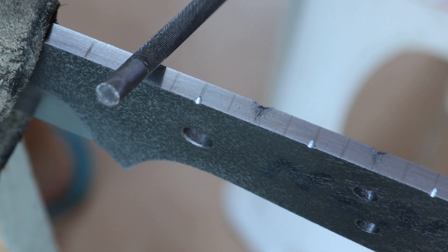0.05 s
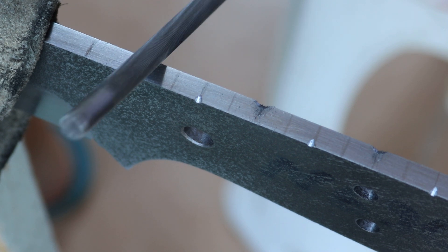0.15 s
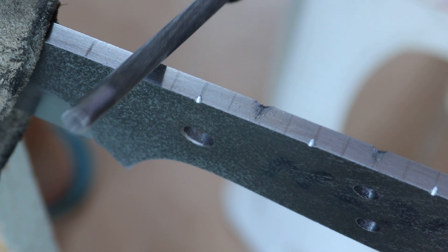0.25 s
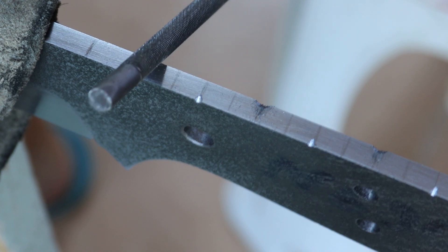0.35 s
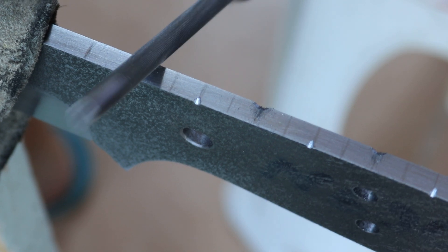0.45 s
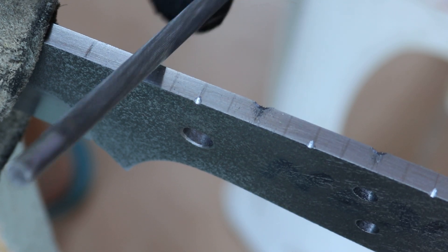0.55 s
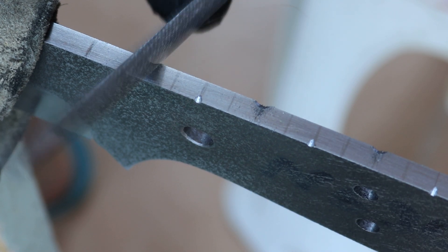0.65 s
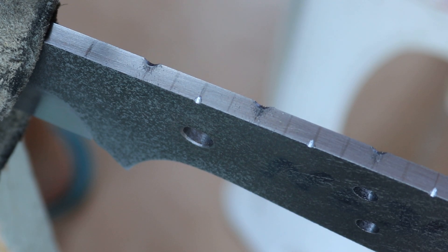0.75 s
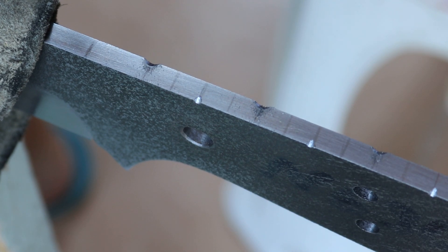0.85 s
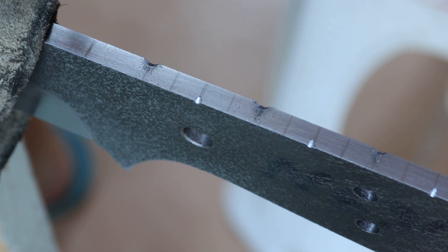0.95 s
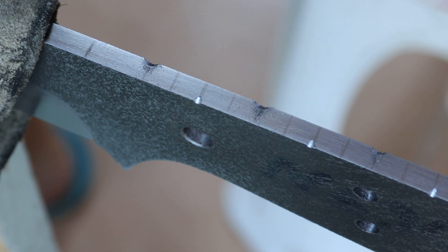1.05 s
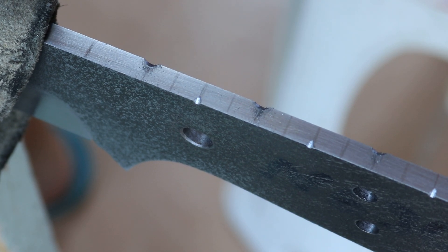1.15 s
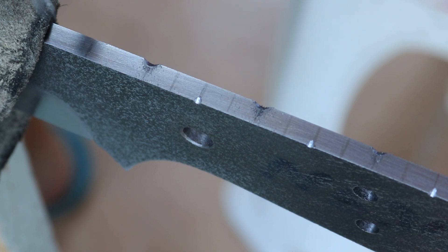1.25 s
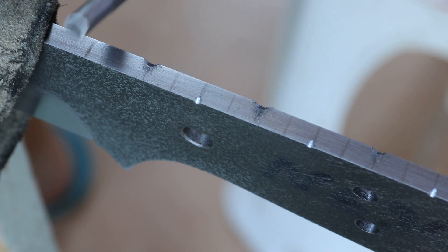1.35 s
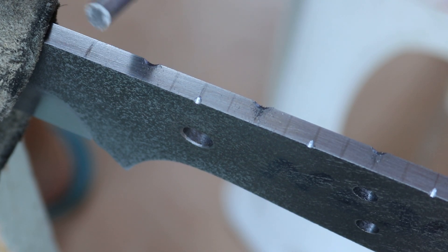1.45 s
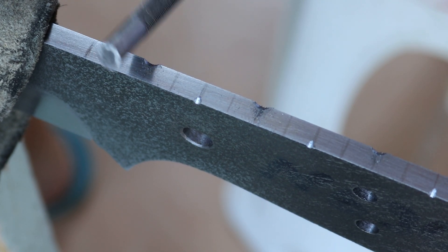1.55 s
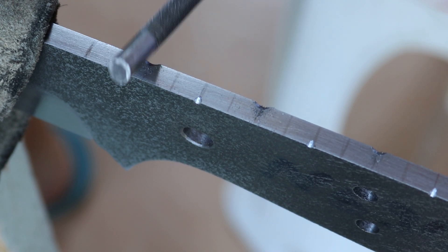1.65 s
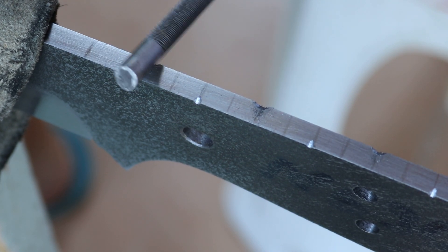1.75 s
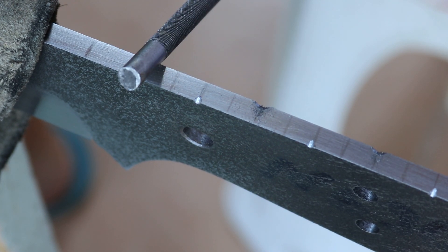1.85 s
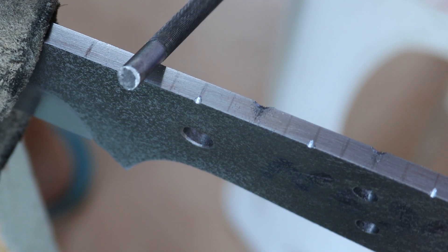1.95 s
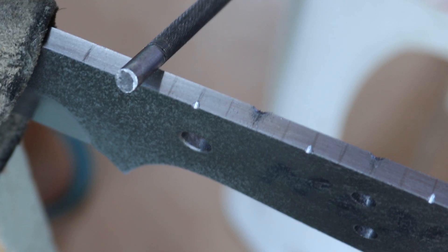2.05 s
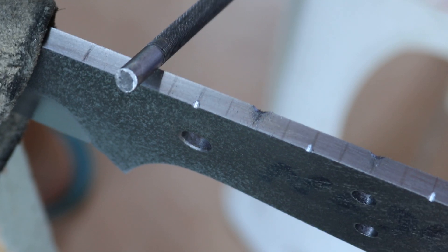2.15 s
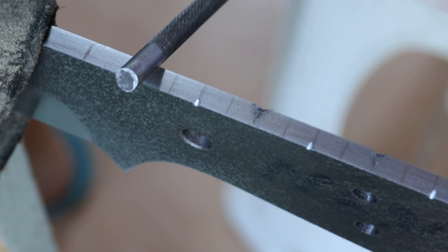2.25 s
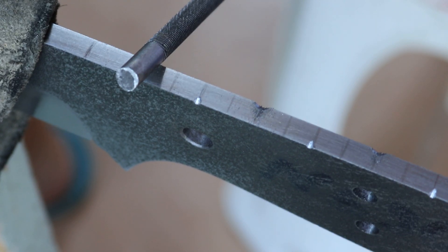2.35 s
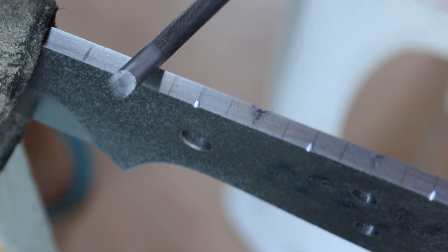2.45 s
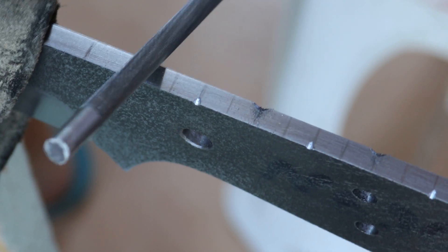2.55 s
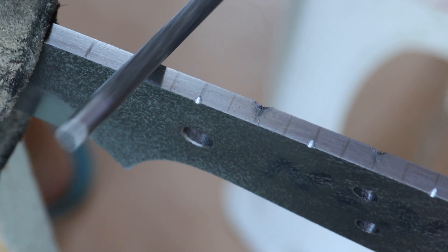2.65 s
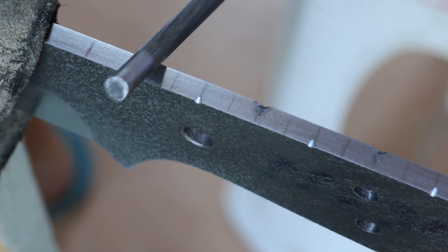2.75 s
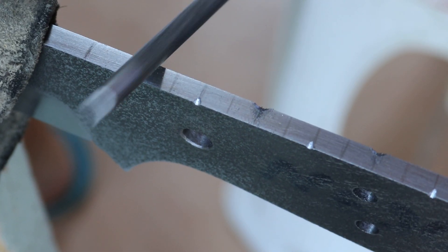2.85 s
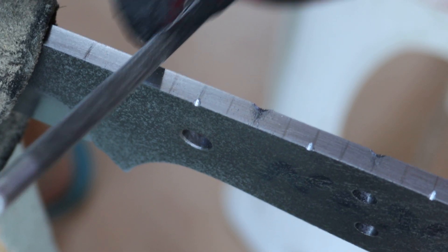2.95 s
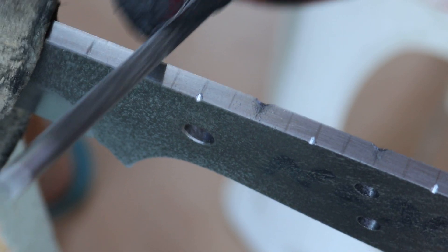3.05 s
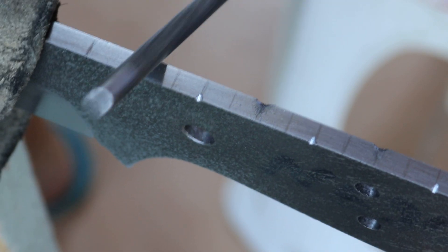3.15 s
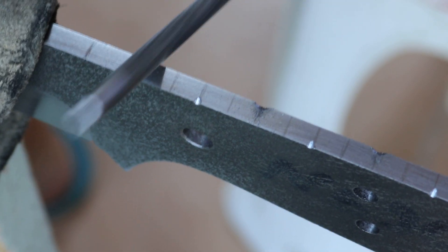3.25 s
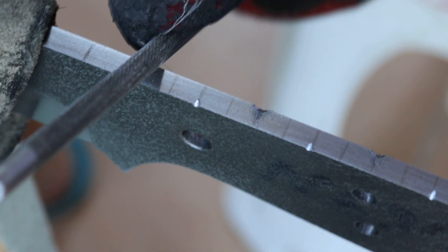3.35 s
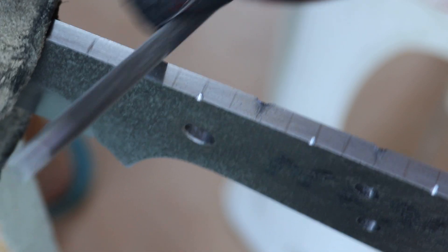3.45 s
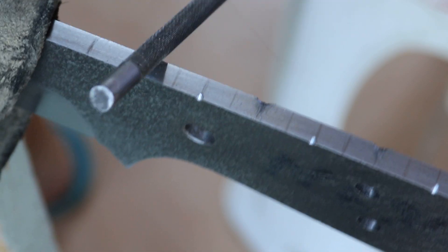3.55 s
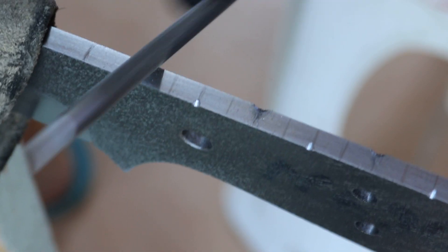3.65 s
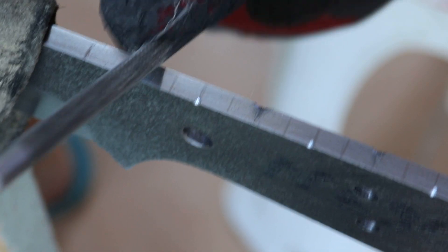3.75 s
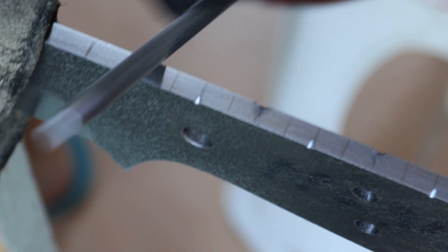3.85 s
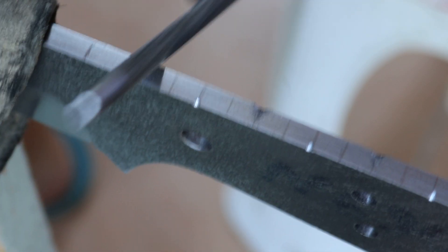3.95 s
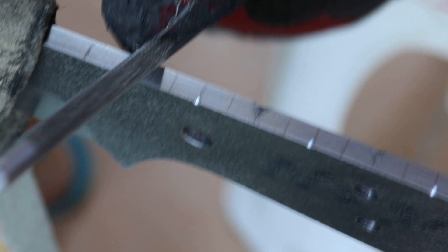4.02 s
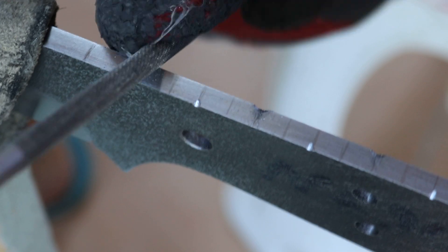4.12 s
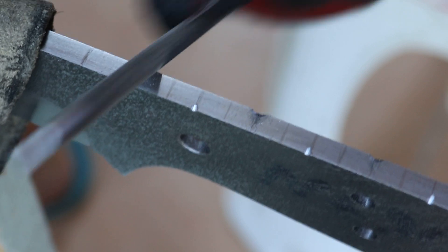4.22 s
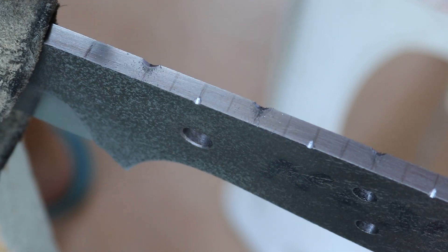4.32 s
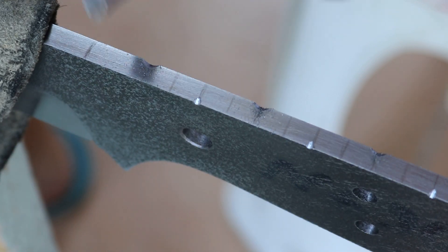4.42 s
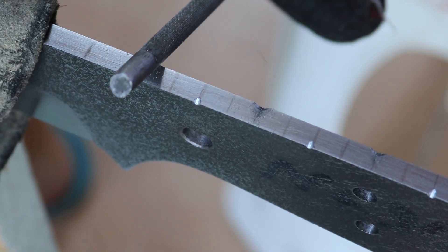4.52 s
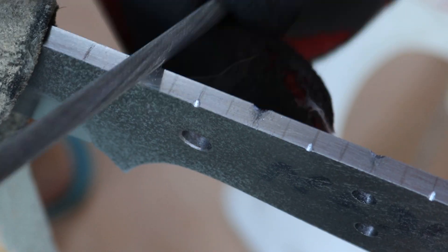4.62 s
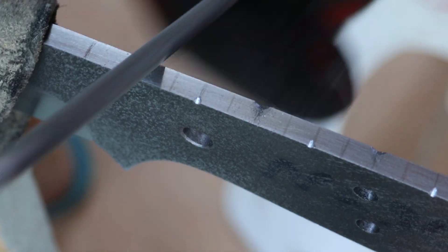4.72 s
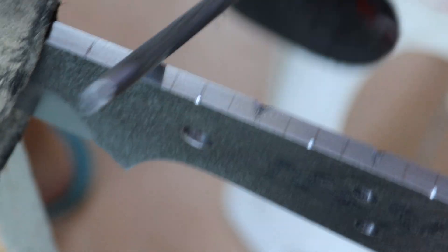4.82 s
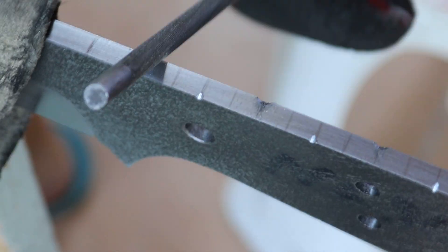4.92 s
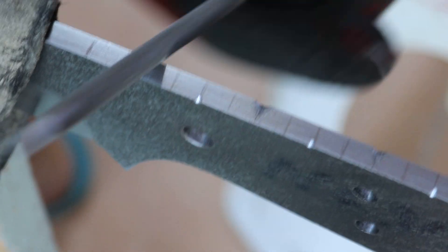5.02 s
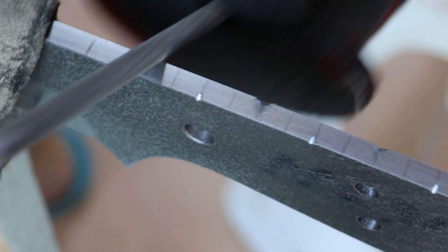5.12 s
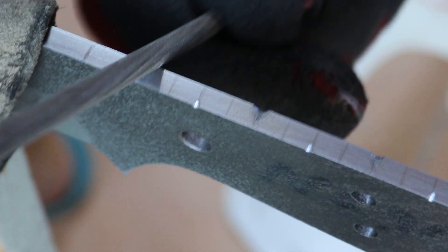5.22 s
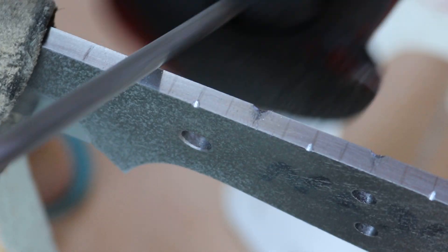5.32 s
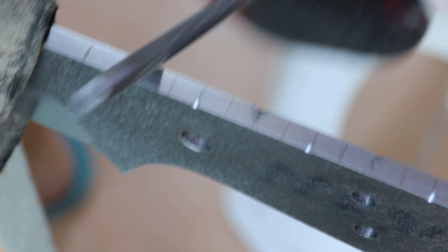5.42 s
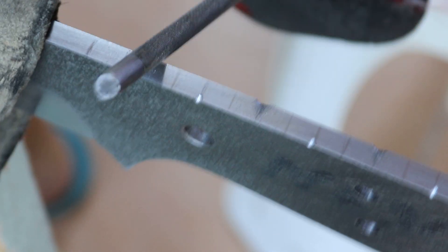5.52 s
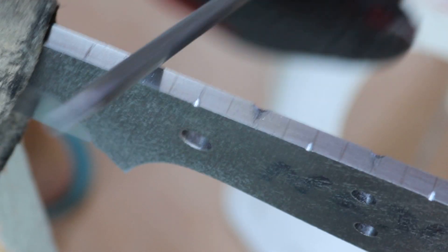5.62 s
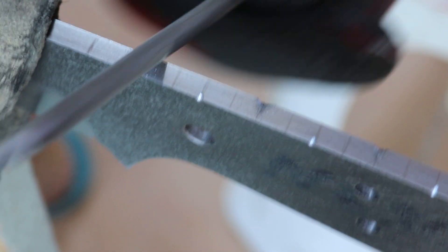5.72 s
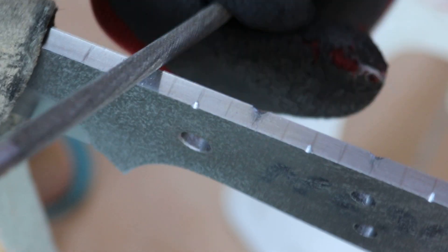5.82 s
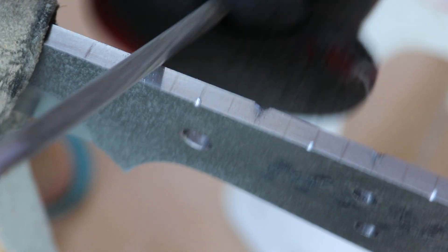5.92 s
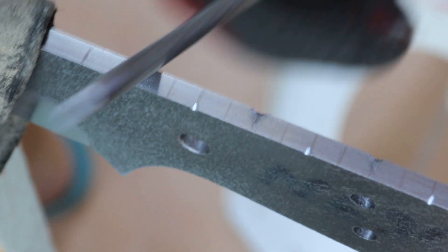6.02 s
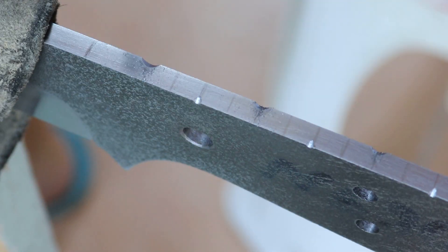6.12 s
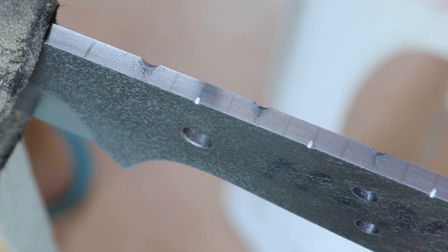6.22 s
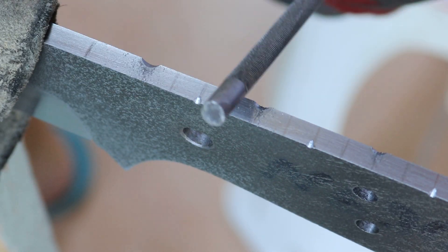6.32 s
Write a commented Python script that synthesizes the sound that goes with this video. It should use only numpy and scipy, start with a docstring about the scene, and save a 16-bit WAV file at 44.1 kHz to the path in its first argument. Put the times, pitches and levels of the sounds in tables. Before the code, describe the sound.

Close stereo in a small workshop: a round file grinds a vise-held steel blade, at first slowed three times, so the rasps are low, coarse and ringing. A pause holds faint scuffs, camera bumps and a duller clack. Low filing resumes, then abruptly changes to bright full-speed scrubbing, breaks briefly around a tick, and continues until it stops, leaving hiss and a far bird chirp.

```python
"""Workshop, stereo ports: first, in slow motion (three times slower and lower), a round file cuts a knife spine.
The blade is held in a vise; strokes, then stray touches and scuffs, then filing again drive its ringing steel.
From 4.01 s the filing runs at full speed, some eight strokes to and fro a second, with a short break, to 6.14 s.
Throughout: drag, tooth chatter and gritty noise, steady background hiss, rumble and bumps on the jostled camera.
A bird, whistling far off, opens and ends the scene. Tables hold playing times, but workshop Hz and decays."""
import sys
import numpy as np
from scipy import signal
from scipy.fft import rfft, irfft, next_fast_len
from scipy.io import wavfile
from scipy.ndimage import uniform_filter1d

SR = 44100
rng = np.random.default_rng(int(sys.argv[2]) if len(sys.argv) > 2 else 0)


def log_audio(samples):
    """Write samples as a 16-bit WAV file to the path given in sys.argv[1]."""
    # one column per channel
    frames = np.atleast_2d(samples).T
    # limit to full scale, then quantise
    limited = np.clip(frames, -1, 1)
    pcm = np.round(limited * 32767).astype(np.int16)
    wavfile.write(sys.argv[1], SR, pcm)


N = 281358

# turns of the file, push and pull by turns: (time [s], pressure [dB], factor on the tooth rate)
TURNS = [(.163, 1.5, 1.22), (.322, -3.5, 0.98), (.498, 1.4, 1.06), (2.55, 1, 1.8), (2.724, -2.75, .9),
         (2.9, 0.5, 1.08), (3.125, -1.5, 0.61), (3.315, 0, .9), (3.514, -1, 0.66), (3.685, 0.9, 0.67),
         (3.861, -1, 0.51), (4.018, 0, 0.53), (4.08, -1, 0.67), (4.14, .5, 0.66), (4.198, -1, 0.71),
         (4.252, 0, .7), (4.622, 0, 0.93), (4.692, -0.5, 0.56), (4.755, 0, 0.82), (4.817, -0.5, 1.01),
         (4.876, 0, 0.66), (4.934, 0, 0.9), (4.993, 0, 0.87), (5.056, -0.5, 1.3), (5.117, 0, 0.69),
         (5.177, -0.5, 1.05), (5.237, -.5, .75), (5.297, 0, 1.15), (5.353, -0.5, 0.66), (5.415, -0.5, 1.18),
         (5.472, -0.5, 0.91), (5.535, -0.5, 1.06), (5.592, -0.5, 0.72), (5.652, 0.5, 1.17), (5.71, 0, 1.26),
         (5.77, 0, 1.18), (5.828, -1.5, 0.63), (5.888, 0, 1.06), (5.947, 0, .8), (6.005, 0.5, 1.25),
         (6.066, -1.5, 0.81)]
# spells of filing, each opening with a push, which may reach top speed sooner:
# (end of the spell [s]: the file lifts off, or full speed begins,
#  factor on rise and catch times of that first push, the same for later strokes,
#  grit level [dB], change of grit from start to end of a push [dB])
FILING_SPELLS = [(.725, .85, .95, -3.5, -5), (4.019, .45, 0.92, 1, -8.5), (4.324, 1, 1.1, 2, -8),
                 (6.14, .9, .95, 1, -1.5)]
# each direction: (share of the stroke before top speed, tooth rate there before the stroke's factor [Hz],
#  glide over the stroke [octaves], drag level [dB], chatter level [dB], grit level [dB])
PUSH_STROKE = (0.3981, 4298, -1.87, -5.5, -17.5, -3)
PULL_STROKE = (0.42, 6400.5, 0.62, -6.5, -14.5, -4.5)
# the file touches the blade: (time [s], level [dB], brightness [Hz])
BLADE_TOUCHES = [(0.038, -18, 5500), (0.17, -5.5, 9050), (0.193, 0, 14100), (.502, 1, 14200),
                 (1.185, -16, 16000), (1.221, -21, 9000), (1.47, -20, 9050), (1.778, -17.5, 7000),
                 (1.866, -19, 7000), (1.898, -19, 12100), (2.084, -4.5, 2330), (2.177, -24, 9000),
                 (2.553, 2, 25500), (2.911, -8, 21770), (4.55, -11.5, 20000)]
# resonances of blade, file and vise, standing on the broad colour below:
# (frequency [Hz], width [Hz], left height [dB], right height [dB])
STEEL_MODES = [(917, 54.4, 13, 13), (1113, 109, 9.5, 8), (1847, 180, 11, 6), (2926, 65, 4.5, 8.5),
               (4004, 180, 7.5, -3.7), (4950, 990, 5.5, 3.5), (6090, 173, 8.5, 7.5), (7930, 97, 8.5, 3.5),
               (8670, 580, -3, 13.5), (8890, 540, 18, -6.5), (9084, 104, -23, 11.5),
               (10730, 250, 6.5, 13.5), (11190, 180, 13.5, 12.5), (17000, 350, 10.5, 8),
               (19200, 1700, -0.5, -1.2), (19200, 770, 7.5, -2), (22000, 900, 9, 17.5), (23100, 510, 9, 12),
               (24300, 160, 22, 5), (27600, 1500, 7.5, 11), (28300, 190, 27, 18), (31000, 580, 13, -18),
               (32300, 1200, 5, 6), (34000, 470, -27, 19.5), (39100, 2400, 15, -0.5), (39700, 2527, 5, 8),
               (44100, 1300, -15, 23), (44750, 980, -14, 17)]
# broad colour of the steel, direct and reflected sound together: (frequency [Hz], level [dB])
STEEL_COLOUR = [(130.0, -17), (300.0, -29), (680.0, -19.5), (850.0, -3), (1300.0, -5), (1900.0, -16),
                (2600.0, -6.5), (5000.0, -8), (8000.0, -8), (12000.0, -16.5), (16000.0, -16),
                (25000.0, -34.5), (36000.0, -38.5), (46000.0, -62.5)]
# phase lead of the left microphone port: (frequency [Hz], lead [rad])
LEFT_LEAD = [(700, -0.5), (3200, 0.6), (4000, 2), (5600, 1.47), (7000, 1.6), (8300, 3), (9800, -0.5),
             (11000, 3.5), (12500, 7.5), (15000, 8), (20000, 8.5)]
# workshop reflections against the direct sound: (frequency [Hz], level [dB])
REFLECTIONS = [(900, -28.5), (1150, -20), (1500, -0.5), (2700, -9), (4000, -6), (9000, -10.5),
               (20000, -27.5)]
# bumps on the camera: (time [s], level [dB], frequency [Hz], left minus right [dB])
CAMERA_BUMPS = [(0.52, -27, 388, -14), (.721, -25, 390, -24.5), (1.238, -32, 346, -22),
                (1.323, -22.5, 490, -29), (1.346, -25, 334, -13), (1.387, -26.5, 278, -7),
                (1.812, -29.5, 332, 23), (1.867, -22, 254, 20), (1.957, -21, 337, 21),
                (2.086, -28.5, 258, -20), (4.2, -21, 358, -21), (4.214, -17, 506, -27),
                (5.774, -20, 224, -19), (5.839, -12, 410, -30), (5.954, -15.5, 527, -6),
                (6.006, -19.5, 440, -7)]
# hands shake bench and camera, before the common rumble gain: (start time [s], length [s], level [dB])
RUMBLE_SWELLS = [(0.004, 1, -44.5), (0.698, 0.2, -36), (1.283, 0.15, -35), (1.8, 0.57, -47.5),
                 (2.799, 0.94, -31.5), (3.802, 0.37, -34.5), (4.052, 0.069, -23.5), (4.137, 0.034, -25),
                 (4.186, 0.044, -21.5), (4.922, 0.091, -42), (5.115, 0.061, -40.5), (5.57, 0.35, -34),
                 (5.694, 0.024, -26.5), (5.746, 0.15, -24.5), (6.294, 0.075, -33.5)]
# colour of the rumble before its level is evened out: (frequency [Hz], level [dB])
RUMBLE_SPECTRUM = [(50, 1), (110, -2), (230, 3.5), (450, 0), (700, -5.5), (1200, -12), (3000, -42)]
# bird chirps, before the direct and echo gains and the random flicker:
# (start time [s], end time [s], first pitch [Hz], last pitch [Hz], level [dB])
BIRD_CHIRPS = [(0, 0.083, 2090, 1950, -38.5), (1.037, 1.191, 1306, 1808, -42),
               (4.524, 4.589, 1300, 1900, -42), (5.765, 5.793, 1736, 1934, -33),
               (5.82, 5.845, 1850, 1970, -33), (6.226, 6.278, 1945, 2020, -42),
               (6.304, 6.354, 1710, 1964, -42.5), (6.322, 6.353, 2430, 2400, -39.5)]
# steady background hiss: (frequency [Hz], level [dB])
HISS_SPECTRUM = [(60, -39), (130, -47), (260, -48.5), (1000, -34), (3000, -39.5), (8000, -44.5),
                 (15000, -48.5), (25000, -53), (46000, -62)]

SLOW, CUT_S = 3, 4.01  # slow-motion factor, and the playing time at which it ends
FINE = SLOW * SR  # the scene is built at this rate [Hz], so that slow motion still has treble
CUT = round(CUT_S * SR)
SIZE = CUT + SLOW * (N - CUT)
BASS_CUT_HZ, EDGE_HZ = 149, 16000  # bass cut at full speed; upper band limit of the whole

FOLLOW_S = .006  # a stroke runs on this long into the next
GRIT_EXTRA = 0.8  # dB per dB beyond the pressure itself: a light stroke skates, a heavy one cuts
SNAGS_PER_S, SNAGS_DB = 110, -11  # burrs that catch in the teeth, strongest early in a stroke
CATCH_S, SKID_DB = .011, -2.5  # after a turn the file skids about this long, softer, until the teeth catch
DRAG_POWER, DRAG_EASE_DB = 0.85, -3  # drag grows with speed to this power, and eases once the file runs freely
SHOVE_DB, SHOVE_S, SHOVE_HZ = -0.5, 0.0083, 1090  # short dull shove about the catch: level, decay, low-pass
CHATTER_POWER = 1.58  # chatter grows with speed to this power
FLUTTER_DB, FLUTTER_HZ = 2.8, 420  # rows of teeth catch and let go: greatest swing, changes a second
TOUCH_S, TOUCH_HZ, DULL_SLOPE = 0.002, 10000, 0.56  # decay at this brightness; duller touches last longer
# faint scuffs while the file is set to the next notch: from and to [s], rate, middle level
SEEK_FROM_S, SEEK_TO_S, SCUFFS_PER_S, SCUFFS_DB = 1, 1.2, 11, -20.5
BUMP_CYCLES = 0.53  # a bump swells for this part of a cycle
SWELL_ARCH = 0.52  # each rumble swell is half a sine wave to this power
RESTING_DB = -53  # rumble between the swells, before the common gain


def filing(side_db=-9.5, side_hz=2000):
    """All strokes and touches drive the same steel; the sliding contact sends each port different treble."""
    force = to_and_fro()
    side = gain_of(side_db) * passed(to_and_fro(), side_hz, "high", order=2)
    sliding = patchy(np.array([force + side, force - side]))
    return steel(sliding + landings())


def to_and_fro():
    """In each spell pushes and pulls alternate; each lasts until the next turn or the end of the spell."""
    force, begin = np.zeros(SIZE), 0
    for spell_end, first_lean, lean, spell_db, ease_db in FILING_SPELLS:
        rows = [row for row in TURNS if begin < row[0] + .02 < spell_end]
        ends = [row[0] for row in rows[1:]] + [spell_end]
        for k, ((start, pressure_db, pace), end) in enumerate(zip(rows, ends)):
            count = index(end) - index(start) + int(FOLLOW_S * FINE)
            direction = (0, *PULL_STROKE) if k % 2 else (ease_db, *PUSH_STROKE)
            add(force, start, stroke(count, pressure_db, pace, lean if k else first_lean, spell_db, *direction))
        begin = spell_end
    return force


def stroke(count, pressure_db, pace, lean, spell_db, ease_db,
           peak, tooth_hz, glide, drag_db, chatter_db, grit_db):
    """The file skids, catches, speeds up and stops: dull drag, tooth-rate chatter, bright grit and snags."""
    u, t = np.linspace(0, 1, count), np.arange(count) / FINE
    peak = np.clip(peak * lean, .1, .9)
    speed = np.maximum(np.sin(np.pi * u ** (np.log(.5) / np.log(peak))), 0)

    teeth = np.cumsum(tooth_hz * pace * speed * 2 ** (glide * (u - peak))) / FINE  # teeth passed so far
    knots = rng.standard_normal((2, 2000))
    # the bite changes at random every tooth or two, and as the hand shakes
    bite = np.interp(teeth / 1.5 + 900 * t, np.arange(knots.shape[1]), knots[0] + 1j * knots[1])
    chatter = 1.276 * (bite * np.exp(2j * np.pi * teeth)).real * speed ** CHATTER_POWER

    drag = passed(chips(count), 3080, "low", order=2)
    drag = drag * speed ** DRAG_POWER * gain_of(DRAG_EASE_DB * speed ** 2)

    grit = passed(chips(count), 4570, "high") * speed ** 2
    burrs = np.sqrt(FINE / SNAGS_PER_S) * (rng.random(count) < SNAGS_PER_S / FINE)
    snags = gain_of(SNAGS_DB) * burrs * np.sqrt(speed) * (1 - u)
    cutting_db = grit_db + spell_db + ease_db * u + GRIT_EXTRA * pressure_db
    cutting = gain_of(cutting_db) * (grit + snags)

    caught = t - CATCH_S * lean  # time since the teeth caught
    shove = passed(chips(count), SHOVE_HZ, "low", order=2) * np.exp(-abs(caught) / SHOVE_S)
    force = gain_of(drag_db) * drag + gain_of(chatter_db) * chatter + cutting
    force = force * gain_of(SKID_DB * (caught < 0)) + gain_of(SHOVE_DB) * shove
    pressure = gain_of(pressure_db) * (1 - np.exp(-t / 0.00074))  # the teeth take a moment to dig in
    flutter = gain_of(FLUTTER_DB * np.tanh(wander(count, hz=FLUTTER_HZ)))
    return force * pressure * flutter


def chips(count, per_s=30000, spread_db=2.5):
    """Tiny fractures of uneven size and random sign, at unit power."""
    size = gain_of(spread_db * np.minimum(rng.exponential(1, count), 4)) * rng.choice([-1, 1], count)
    x = size * (rng.random(count) < per_s / FINE)
    return x / np.sqrt(np.mean(x ** 2) + 1e-12)


def patchy(x, patchy_db=2.5):
    """The contact point slides, so the steel is driven in shifting patches of frequency."""
    z = signal.stft(x, nperseg=512)[2]
    patches = rng.standard_normal(z.shape[1:])
    patches = uniform_filter1d(patches, size=4, axis=0)  # across frequency
    patches = uniform_filter1d(patches, size=3, axis=1)  # across time
    gain = gain_of(patchy_db * np.minimum(patches / patches.std(), 1.5))
    return signal.istft(z * gain / np.sqrt(np.mean(gain ** 2)), nperseg=512)[1][:, :SIZE]


def landings(spread_db=11.5, scuff_hz=7000):
    """The clear touches, and faint scuffs at random while the file seeks the next notch."""
    force = np.zeros(SIZE)
    for s, db, bright_hz in BLADE_TOUCHES:
        add(force, s, touch(db, bright_hz))
    length = SEEK_TO_S - SEEK_FROM_S
    for place, size in rng.random((int(SCUFFS_PER_S * length), 2)):
        db = SCUFFS_DB + spread_db * (2 * size - 1)
        add(force, SEEK_FROM_S + place * length, touch(db, scuff_hz))
    return force


def touch(db, bright_hz):
    """Steel lands on steel with a very short crunch: decaying noise, longer when duller."""
    t = np.arange(FINE // 20) / FINE
    decay = TOUCH_S * (TOUCH_HZ / bright_hz) ** DULL_SLOPE
    crunch = rng.standard_normal(len(t)) * np.exp(-t / decay)
    return gain_of(db) * passed(crunch, bright_hz, "low")


def steel(force, size=16384):
    """The clamped blade rings with its modes, and reaches both ports directly and off the walls."""
    hz = np.fft.rfftfreq(size, 1 / FINE)
    db = read(STEEL_COLOUR, hz)
    for f, width, left, right in STEEL_MODES:
        db = db + np.array([[left], [right]]) / (1 + (2 * (hz - f) / width) ** 2)
    db = db - 10 * np.log10(1 + gain_of(read(REFLECTIONS, hz)) ** 2)  # leaves room for the reflections
    log_gain = np.log(gain_of(np.hstack([db, db[:, -2:0:-1]])))
    body = np.exp(np.conj(signal.hilbert(log_gain)))[:, :len(hz)]  # causal: it rings after each blow
    body[1] *= np.exp(-1j * read(LEFT_LEAD, hz))
    early = size // 64  # margin for sound that the port lead brings forward
    ring = np.roll(irfft(body), early, axis=1)[:, :size // 2]
    direct = signal.oaconvolve(force, ring, axes=1)[:, early:early + SIZE]
    walls = shaped(room(t60=0.12), REFLECTIONS)
    return direct + signal.oaconvolve(direct, walls, axes=1)[:, :SIZE]


def room(t60, count=FINE // 3):
    """Sparse decaying reflections of random sign, different at each port, with energy 1."""
    t = np.arange(count) / FINE
    taps = rng.choice([-1, 1], (2, count)) * (rng.random((2, count)) < 4000 / FINE) * (t > .002)
    taps = taps * gain_of(-60 * t / t60)
    return taps / np.linalg.norm(taps, axis=1, keepdims=True)


def handling(rumble_db=-1.0, pan_db=-8.0, shared=0.72):
    """Hands on bench and camera: swells of low noise, and soft damped bumps nearer to one port."""
    power = np.full(SIZE, gain_of(RESTING_DB) ** 2)
    for start, length, db in RUMBLE_SWELLS:
        u = np.linspace(0, 1, index(start + length) - index(start))
        arch = abs(np.sin(np.pi * u)) ** SWELL_ARCH
        add(power, start, (gain_of(db) * arch) ** 2)
    noise = rng.standard_normal((3, SIZE))
    noise = shaped(noise[:2] + shared * noise[2], RUMBLE_SPECTRUM)
    out = gain_of(rumble_db) * ports(pan_db) * noise / noise.std() * np.sqrt(power)
    t = np.arange(FINE // 20) / FINE
    for s, db, hz, side_db in CAMERA_BUMPS:
        swell = t * hz / BUMP_CYCLES
        bump = gain_of(db) * swell * np.exp(1 - swell) * np.sin(2 * np.pi * hz * t)
        for port, gain in zip(out, ports(side_db)):
            add(port, s, gain * bump)
    return out


def bird(direct_db=1.0, echo_db=0.0, waver=0.046):
    """Far off: short rough whistles, gliding and mostly rising, blurred by room echoes."""
    song = np.zeros(SIZE)
    for start, end, first_hz, last_hz, db in BIRD_CHIRPS:
        u = np.linspace(0, 1, index(end) - index(start))
        glide_hz = last_hz + (first_hz - last_hz) * (1 - u) ** 3
        hz = glide_hz * (1 + waver * wander(len(u), hz=960))
        level = gain_of(db + 4.8 * wander(len(u), hz=300)) * np.sqrt(abs(np.sin(np.pi * u)))
        add(song, start, level * np.sin(2 * np.pi * np.cumsum(hz) / FINE))
    echo = signal.oaconvolve(song[None], room(t60=0.44), axes=1)[:, :SIZE]
    return gain_of(direct_db) * song + gain_of(echo_db) * echo


def hiss(shared=0.53):
    """Quiet coloured background noise, partly common to both ports."""
    noise = rng.standard_normal((3, SIZE))
    return shaped((noise[:2] + shared * noise[2]) / np.hypot(1, shared), HISS_SPECTRUM)


def ports(pan_db):
    """Left and right gains with a mean of 1."""
    gains = gain_of([[pan_db / 2], [-pan_db / 2]])
    return gains / gains.mean()


def gain_of(db):
    """Decibels to amplitude."""
    return 10 ** (np.asarray(db) / 20)


def read(points, hz):
    """A spectrum's value, on a log-frequency axis."""
    f, value = np.transpose(points)
    return np.interp(np.log(hz + 1), np.log(f + 1), value)


def index(s):
    """Playing time to sample number of the finely sampled scene."""
    stretched = s + (SLOW - 1) * np.maximum(s - CUT_S, 0)
    return np.round(SR * np.maximum(stretched, 0)).astype(int)


def add(mix, s, sound):
    """Mixes a sound in at playing time s."""
    part = mix[index(s):][:len(sound)]
    part += sound[:len(part)]


def shaped(x, points):
    """Colours x by a spectrum of (frequency [Hz], level [dB])."""
    size = next_fast_len(x.shape[-1], True)
    gain = gain_of(read(points, np.fft.rfftfreq(size, 1 / FINE)))
    return irfft(rfft(x, size) * gain, size)[..., :x.shape[-1]]


def passed(x, hz, kind, order=1):
    """Gentle low-pass or high-pass."""
    return signal.lfilter(*signal.butter(order, min(hz, SR), kind, fs=FINE), x)


def wander(count, hz):
    """Random line of about unit size that heads for a new value hz times a second."""
    at = np.arange(count) * hz / FINE
    return np.interp(at, np.arange(count), rng.standard_normal(count))


def scene():
    """Every fine sample is played in slow motion; then the rate drops to a third, with less bass."""
    fine = filing() + handling() + bird() + hiss()
    full_speed = passed(fine[:, CUT:], BASS_CUT_HZ, "high", order=3)
    full_speed = signal.resample_poly(full_speed, 1, SLOW, axis=1)
    return np.hstack([fine[:, :CUT], full_speed])[:, :N]


def record(dry):
    """The microphone chain: a hard ceiling on peaks, then an upper band limit."""
    dry = np.clip(dry, -.8, .8)
    low_pass = signal.firwin(255, EDGE_HZ, window=("kaiser", 9), fs=SR)
    return signal.oaconvolve(dry, low_pass[None], "same")


dry = scene()
out = record(dry)
log_audio(out)
```